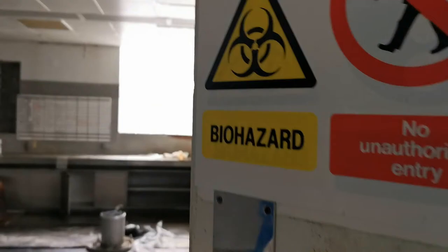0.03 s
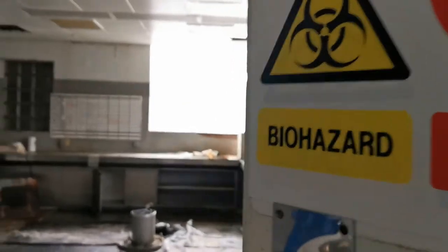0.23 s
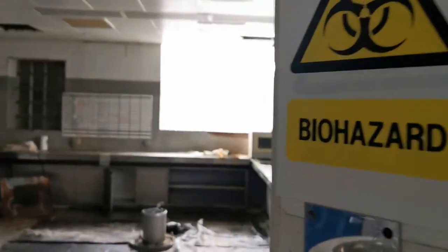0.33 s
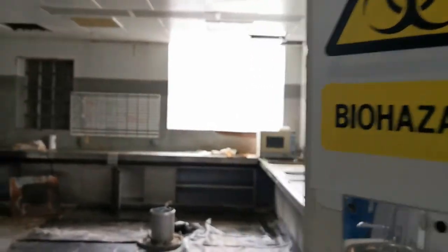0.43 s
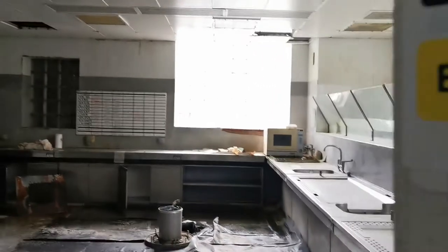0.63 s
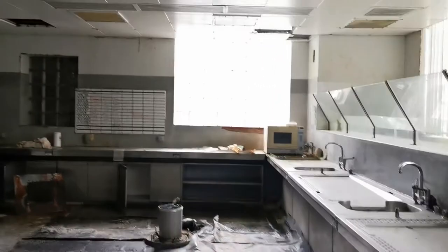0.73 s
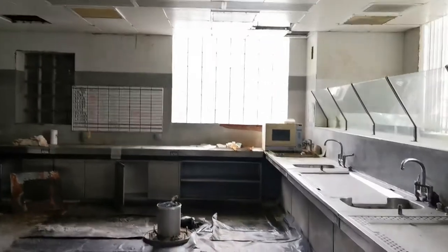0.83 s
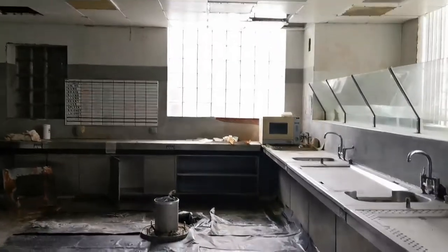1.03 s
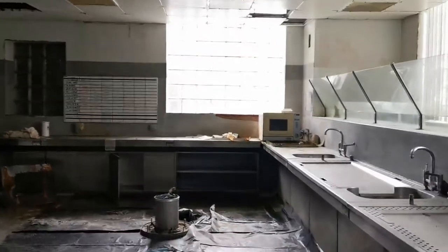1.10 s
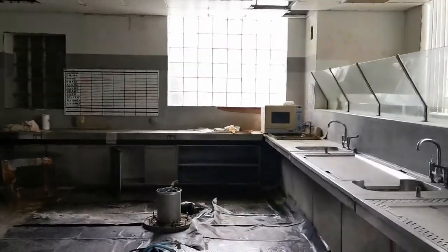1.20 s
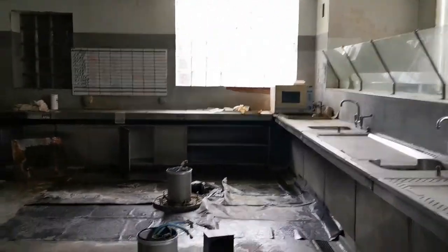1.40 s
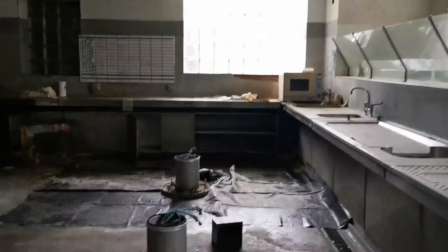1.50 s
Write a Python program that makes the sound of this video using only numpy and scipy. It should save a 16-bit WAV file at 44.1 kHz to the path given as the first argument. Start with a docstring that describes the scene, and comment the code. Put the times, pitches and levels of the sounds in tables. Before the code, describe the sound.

Footsteps in a bare, echoing room: a hollow thud, then knocks and crunching grit.

```python
"""A bare, hard-walled derelict room, and two steps into it. The first lands on a loose board with a
hollow thud; the board rings and the sole scuffs over grit. The second knocks heel and toe on the floor,
grinds the grit and snaps a piece of debris. Small bits tick and the room rings on over a faint rumble.
Hits are pushes and rattles sent through resonant bodies; scuffs are showers of tiny fractures.
The left microphone adds a bright peak near 10 kHz."""
import sys
import numpy as np
from scipy import signal
from scipy.fft import rfft, irfft, next_fast_len
from scipy.io import wavfile

SR = 44100
rng = np.random.default_rng(int(sys.argv[2]) if len(sys.argv) > 2 else 0)


def persist_wave(psi):
    """Save psi, clipped to +-1, as 16-bit WAV."""
    counts = np.round(np.clip(psi, -1, 1) * 32767).astype(np.int16)
    wavfile.write(sys.argv[1], SR, np.atleast_2d(counts).T)


N = 68355

# Room tone. Each row: frequency in Hz, relative gain in dB.
AIR_COLOUR = [(25, 1.5), (50, -7), (100, -8), (170, -8), (330, -10.5), (600, -19.5), (2000, -20),
              (4000, -24), (8000, -29.5), (15000, -33)]
# The room's tail. Each row: frequency in Hz, seconds to fall 60 dB.
ROOM_DECAY = [(100, 0.76), (300, 1.06), (800, 1.19), (2000, 1.05), (4500, 0.88), (9000, 0.69), (15000, .4)]
# Stereo image of the room. Each row: frequency in Hz, left-right likeness from 0 to 1.
STEREO_LIKENESS = [(30, 0.32), (130, 0.77), (300, 0.79), (600, 0.77), (1200, 0.35), (2500, 0), (10000, 0)]

# Small bits ticking. Each row: start in seconds, level in dB, pitch in Hz, left over right in dB.
DEBRIS_TICKS = [(0.3661, -63, 1980, 5), (.467, -55, 2750, 6.5), (.484, -63, 2060, 17),
                (.567, -56, 1874, -2), (1.099, -66, 3660, -6.5), (1.4386, -59, 1950, 4.5),
                (1.4723, -59, 2030, 2)]
# Debris breaking. Each row: start in seconds, level in dB, rattle in seconds.
DEBRIS_SNAPS = [(1.2154, -45.5, 0.0014), (1.2223, -49.5, 0.023)]
# The snap's bright edge. Each row: frequency in Hz, relative gain in dB.
SNAP_EQ = [(300, -30), (2000, -12), (4500, 2.5), (7000, -2.5), (9500, -0.5), (11000, -4), (12500, -13),
           (15000, -15.5)]

# Sole on grit. Each row: start, rise, hold and release in seconds, relative level in dB, treble in dB.
GRIT_SCUFFS = [(0.196, 0.015, .03, 0.18, -50.5, 2), (0.294, 0.0362, .08, 0.17, -63, -4.5),
               (0.446, 0.054, 0.073, 0.15, -59, -3.5), (0.937, .003, 0.015, .04, -65, 10),
               (0.957, 0.042, 0.22, 0.12, -68, 1), (1.147, 0.013, 0.053, .05, -61.5, -3),
               (1.199, 0.0091, 0.0191, 0.25, -46.5, 0)]
# The crunch's tone. Each row: frequency in Hz, relative gain in dB.
GRIT_EQ = [(200, -27), (900, -10.5), (2000, -1), (3200, -1), (4600, -0.5), (6500, -6), (8500, -5),
           (12000, -8), (15000, -15)]

# Shoe on floor. Each row: start in seconds, level in dB, rattle in seconds, pitch in Hz, relative width.
SHOE_KNOCKS = [(.001, -63, .04, 370, 0.91), (.002, -65.5, 0.059, 1620, .7), (.941, -53, 0.044, 1020, 0.235),
               (.947, -53.5, 0.042, 800, 1.2), (0.98, -55, .06, 500, 1.4), (1.001, -51, 0.073, 1190, 0.86),
               (1.012, -52.5, 0.044, 370, 0.9), (1.055, -55.5, 0.2, 1970, 0.95), (1.154, -53, .04, 1700, 2),
               (1.207, -45, 0.028, 1330, 1.35)]
# The tone all knocks share. Each row: frequency in Hz, relative gain in dB.
KNOCK_EQ = [(50, -41), (130, -16), (300, -4.5), (800, -4), (1600, -3.5), (2400, -3), (5000, -11),
            (15000, -12.5)]
# Floor and room under the knocks. Each row: pitch in Hz, relative level in dB, seconds to fall 60 dB.
FLOOR_RING = [(159.86, -11.5, 1.0), (272, -4, 0.76), (335, 0, 0.6), (446, -11, .3), (1176, -6, 0.39),
              (1280, 0, 0.32)]
# Low drone under the second step. One row: start, rise, hold and release in seconds, level in dB.
FLOOR_DRONE = (1.1, .14, .2, 0.06, -71)

# Blows on the loose board. Each row: start in seconds, level in dB, rattle in seconds.
BOARD_THUDS = [(0.2001, -50, 0.05), (0.209, -46, .04), (0.2142, -42.5, 0.044), (.222, -36.5, 0.009),
               (.2295, -43, 0.0087), (.2365, -44, 0.031)]
# The thud's body. Each row: frequency in Hz, relative gain in dB.
THUD_EQ = [(40, -38), (85, -32), (125, -12), (240, -12.5), (480, -10), (720, 0), (920, -1), (1200, -5),
           (1850, -2.5), (2450, -4.5), (3100, -19), (6000, -35), (15000, -55)]
# The hollow under the board, booming at the hardest blows. Each row: start in seconds, level in dB.
HOLLOW_BOOMS = [(.2150, -40.5), (.2220, -32.5), (.2290, -43)]
# The board's modes. Each row: pitch in Hz, relative level in dB, seconds to fall 60 dB.
BOARD_RING = [(340, -12, 1.0), (590, -13.5, 1.0), (722, -0.5, .8), (842, -1, 1.3), (867.5, -0.5, 1.0),
              (940, -6, 0.6), (1015, -6, .6), (1183, -10, 0.38), (1370, -10.5, 1.2), (1622, -15, 1.1),
              (1720, -11, .9), (1863, -9, .6), (1974, -13, .6), (2190, -8, .8)]
# Sole sliding on the board. One row: start, rise, hold and release in seconds, level in dB.
BOARD_RUB = (0.37, 0.02, .15, .25, -61)
# The rub's dull tone. Each row: frequency in Hz, relative gain in dB.
RUB_EQ = [(60, -14), (140, -5.5), (300, -8.5), (600, -3.5), (840, 3), (1100, -5), (2100, -1.5), (3200, -13),
          (8000, -39)]

# Microphone colours, the left one brighter. Each row: frequency in Hz, gain in dB.
LEFT_MIC_EQ = [(150, -0.5), (700, 2), (2200, 2.74), (5000, 1), (7900, -1), (9100, 14.5), (10600, 11.5),
               (12500, 5), (15500, 1)]
RIGHT_MIC_EQ = [(150, 2.5), (700, -1), (2200, 0.6), (5000, 1), (7900, 2.5), (10000, -7), (15500, -7)]


def amp(db):
    """Decibels to gain."""
    return 10 ** (np.asarray(db) / 20)


def along(points, hz):
    """Read a curve of (Hz, value) points on a log frequency axis."""
    f, values = np.transpose(points)
    return np.interp(np.log(hz + 1), np.log(f + 1), values)


def freqs(size=8192):
    """The frequency grid of a filter, in Hz."""
    return np.fft.rfftfreq(size, 1 / SR)


def eq(points):
    """Gain per frequency of an EQ curve."""
    return amp(along(points, freqs()))


def resonance(hz, width):
    """Gain of one broad peak; width is a share of its pitch, and raising it to a power narrows it."""
    f = freqs() + 1
    return 1 / np.hypot(1, (f / hz - hz / f) / width)


def through(x, response):
    """Convolve and keep the length of the scene."""
    return signal.fftconvolve(np.atleast_2d(x), np.atleast_2d(response), axes=1)[:, :N]


def body(x, gain):
    """Play x through a minimum-phase body of unit energy, coloured by this gain per frequency."""
    cepstrum = irfft(np.log(np.maximum(gain, 1e-6)))
    half = len(cepstrum) // 2
    cepstrum[1:half] *= 2
    cepstrum[half + 1:] = 0
    response = irfft(np.exp(rfft(cepstrum)))[:half]
    return through(x, response / np.linalg.norm(response))


def pushes(rows):
    """One clean push per (start, dB) row, with the energy of 10 ms at that level."""
    out = np.zeros(N)
    for start, db in rows:
        out[round(start * SR)] += amp(db) * np.sqrt(SR / 100)
    return out


def contact(start, db, rattle_s):
    """A push and a rattle that falls 20 dB in rattle_s, with the energy of 10 ms at this level."""
    t = np.arange(SR // 5) / SR
    hit = rng.standard_normal(len(t)) * amp(-20 * t / rattle_s)
    hit *= np.sqrt(rattle_s / 0.012) / np.linalg.norm(hit)
    hit[0] = 1  # the push
    hit *= amp(db) * np.sqrt(SR / 100) / np.linalg.norm(hit)
    return np.pad(hit, (round(start * SR), N))[:N]


def ringing(modes, attack_s=0.0037):
    """Decaying modes with slightly wandering phase, at unit energy."""
    t = np.arange(SR) / SR
    drift = np.cumsum(rng.standard_normal((len(modes), SR)), axis=1) * 4 / np.sqrt(SR)
    phases = drift + rng.uniform(0, 2 * np.pi, (len(modes), 1))
    ring = sum(amp(db - 60 * t / t60) * np.sin(2 * np.pi * hz * t + phase)
               for (hz, db, t60), phase in zip(modes, phases))
    ring *= np.clip(t / attack_s, 0, 1)
    return ring / np.linalg.norm(ring)


def grains(start, rise, hold, release, db, per_second=3000, spread_db=4.5):
    """A shower of tiny fractures that swells, holds, then falls 60 dB over the release."""
    t = np.arange(N) / SR - start
    clicks = (rng.random(N) < per_second / SR) * rng.choice([-1, 1], N)
    clicks = clicks * amp(spread_db * rng.standard_normal(N))
    envelope = np.clip(t / rise, 0, 1) * amp(db - 60 * np.maximum(t - rise - hold, 0) / release)
    return clicks / clicks.std() * envelope


def diffuse():
    """Stereo noise, narrow in the bass and wide in the treble."""
    size = next_fast_len(N, True)
    angle = np.arccos(along(STEREO_LIKENESS, freqs(size))) / 2
    spectra = rfft(rng.standard_normal((2, size)))
    mid, side = irfft(spectra * [np.cos(angle), np.sin(angle)], size)[:, :N]
    return np.array([mid + side, mid - side])


def in_room(x, early_db, late_db, early_t60_s=0.32, build_s=0.0032):
    """Direct sound, dense reflections from the doorway, and the long tail of the room."""
    hz, frame_s, spectra = signal.stft(diffuse(), SR, nperseg=256)
    decay = amp(-60 * frame_s / along(ROOM_DECAY, hz)[:, None])
    late = signal.istft(spectra * decay, SR, nperseg=256)[1][:, :N]
    t = np.arange(N) / SR
    early = diffuse() * amp(-60 * t / early_t60_s) / np.sqrt(early_t60_s)
    scale = np.sqrt(np.log(1e6) / SR)  # gives a one-second tail unit energy
    response = scale * (amp(early_db) * early + amp(late_db) * late) * np.clip(t / build_s, 0, 1)
    response[:, 0] = 1  # direct sound
    return through(x, response)


def air():
    """The bed: faint, steady rumble and hiss of the building."""
    return amp(-70.5) * body(diffuse(), eq(AIR_COLOUR))


def debris():
    """One piece snaps sharply underfoot; smaller bits tick left and right, each at its own pitch."""
    snap = body(sum(contact(*row) for row in DEBRIS_SNAPS), eq(SNAP_EQ))
    ticks = np.zeros((2, N))
    for start, db, hz, pan_db in DEBRIS_TICKS:
        tick = body(pushes([(start, db)]), resonance(hz, width=0.22) ** 2)
        ticks += amp([[pan_db / 2], [-pan_db / 2]]) * tick
    return in_room(snap, early_db=-11, late_db=-4.5) + in_room(ticks, early_db=-7, late_db=-10)


def grit():
    """Grit crunches under the sole; a treble shelf makes some strokes brighter than others."""
    shelf = along([(2500, 0.052), (10000, 0.95)], freqs())
    crunch = sum(body(grains(*stroke), eq(GRIT_EQ) * amp(treble_db * shelf))
                 for *stroke, treble_db in GRIT_SCUFFS)
    return amp(-3.5) * in_room(crunch, early_db=-0.5, late_db=2)


def shoe(ring_cap_db=-54):
    """Heel, sole and toe knock on the floor, each at its own pitch; its low modes ring and drone on."""
    knocks = sum(body(contact(start, db, rattle_s), eq(KNOCK_EQ) * resonance(hz, width) ** 1.52)
                 for start, db, rattle_s, hz, width in SHOE_KNOCKS)
    footfalls = pushes([(start, min(db, ring_cap_db)) for start, db, *_ in SHOE_KNOCKS])
    ring = amp(-14) * through(footfalls, ringing(FLOOR_RING))
    drone = body(grains(*FLOOR_DRONE), resonance(hz=315, width=0.35) ** 2)
    return (in_room(knocks, early_db=-3.5, late_db=-3.5)
            + in_room(ring + drone, early_db=-3.5, late_db=-9.5))


def board():
    """The first step slaps the loose board, which booms and rings; then the sole rubs along it."""
    thud = body(sum(contact(*row) for row in BOARD_THUDS), eq(THUD_EQ))
    boom = body(pushes(HOLLOW_BOOMS), resonance(hz=863, width=0.43) ** 2.57)
    hardest_blow = pushes(HOLLOW_BOOMS[1:-1])
    ring = amp(-6.5) * through(hardest_blow, ringing(BOARD_RING))
    rub = body(grains(*BOARD_RUB), eq(RUB_EQ))
    return (in_room(thud + rub, early_db=-1, late_db=-4.5)
            + in_room(boom, early_db=-9, late_db=-11)
            + in_room(ring, early_db=-12, late_db=-16))


def scene():
    """The stereo mix: two steps, their grit and debris, and the room tone."""
    return board() + shoe() + grit() + debris() + air()


def record(dry):
    """Two unlike microphones, the left a touch late, with the very top cut off."""
    left_lag_s, top_hz = 0.00017, 15700
    size = next_fast_len(N + SR // 4, True)
    f = freqs(size)
    left = amp(along(LEFT_MIC_EQ, f)) * np.exp(-2j * np.pi * f * left_lag_s)
    right = amp(along(RIGHT_MIC_EQ, f))
    return irfft(rfft(dry, size) * [left, right] * (f < top_hz), size)[:, :N]


dry = scene()
out = record(dry)
persist_wave(out)
```